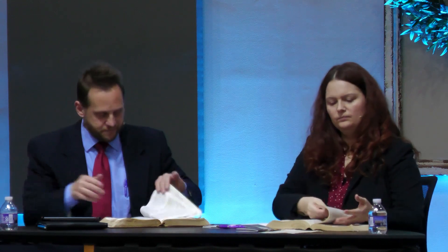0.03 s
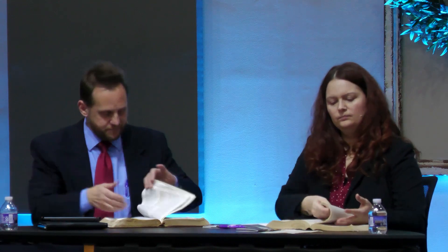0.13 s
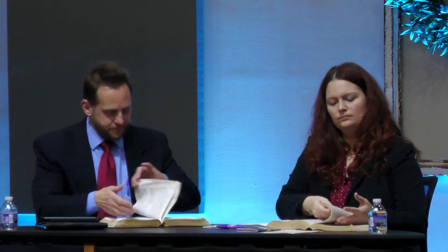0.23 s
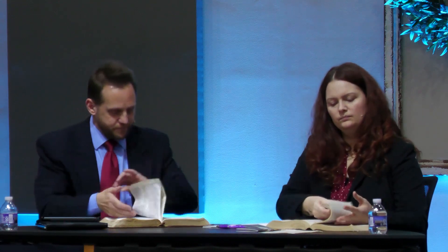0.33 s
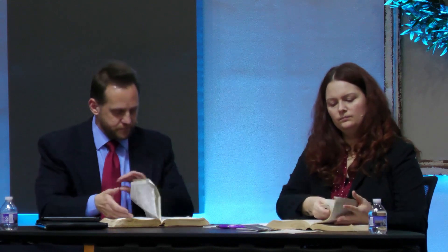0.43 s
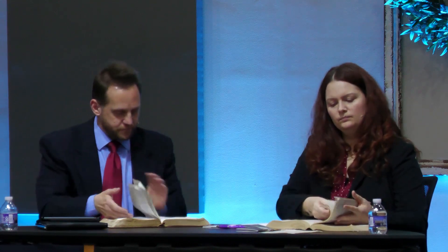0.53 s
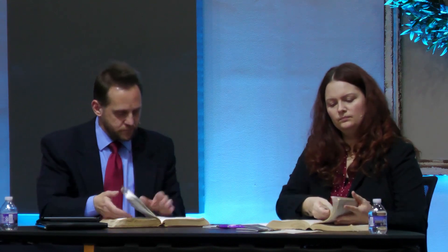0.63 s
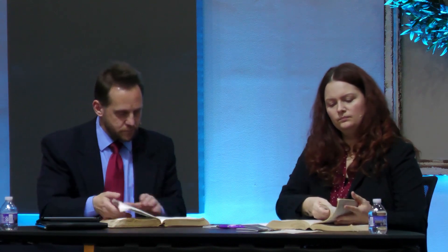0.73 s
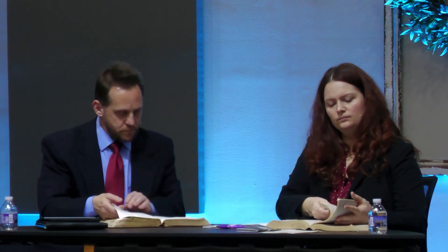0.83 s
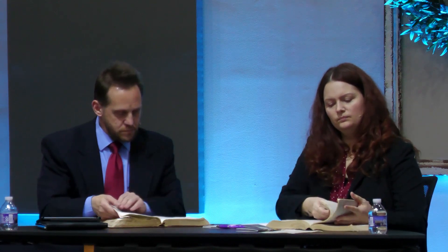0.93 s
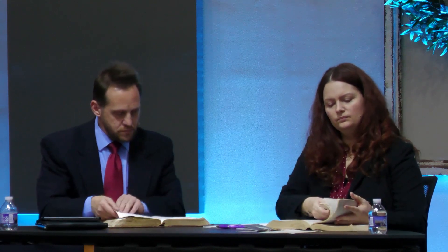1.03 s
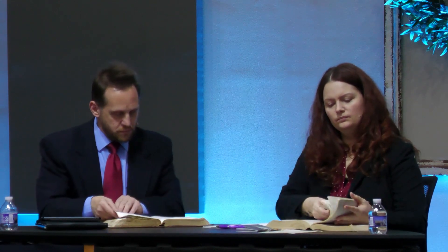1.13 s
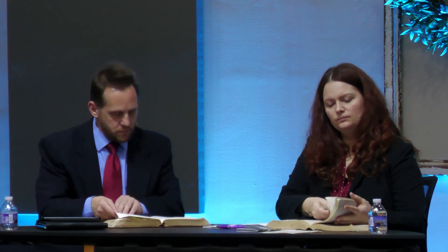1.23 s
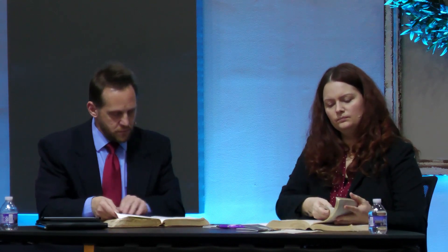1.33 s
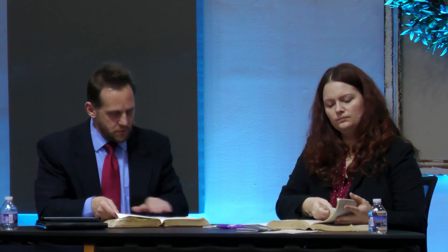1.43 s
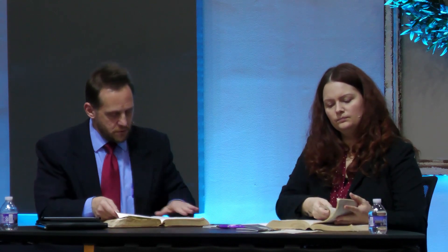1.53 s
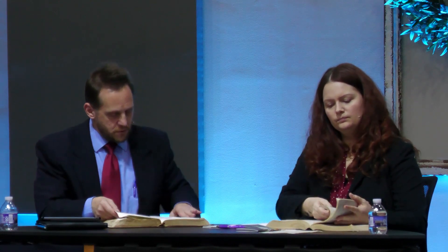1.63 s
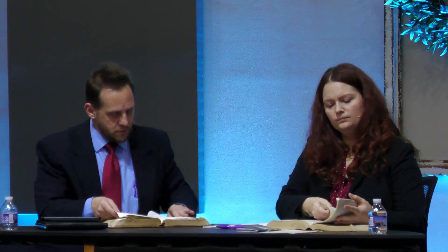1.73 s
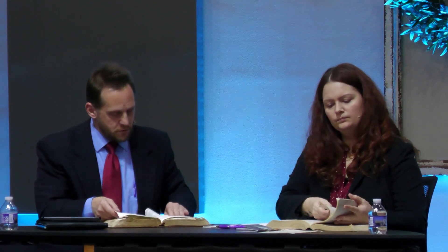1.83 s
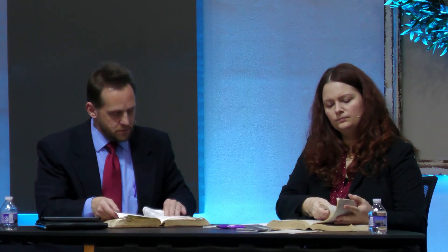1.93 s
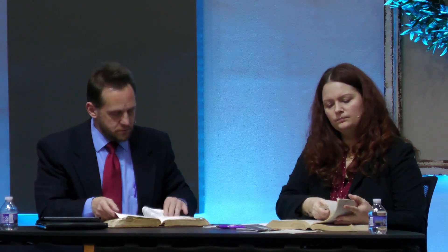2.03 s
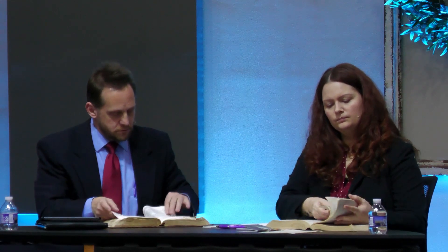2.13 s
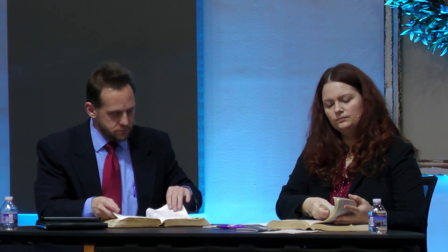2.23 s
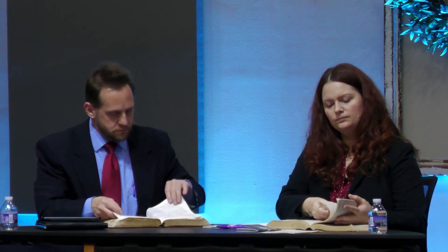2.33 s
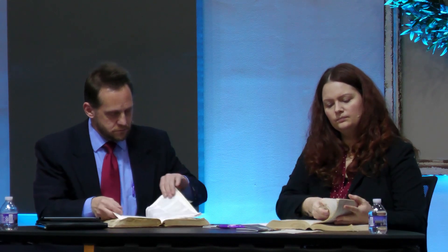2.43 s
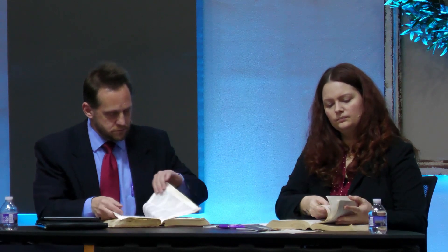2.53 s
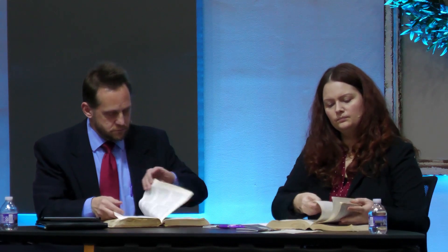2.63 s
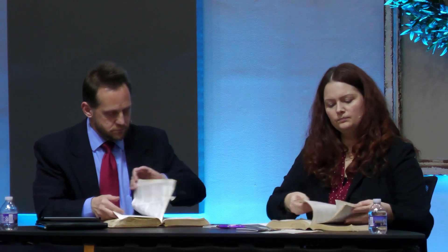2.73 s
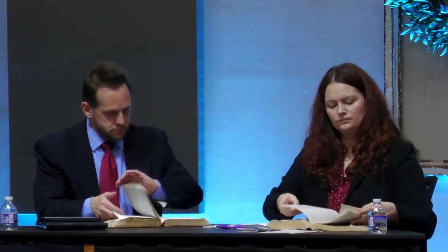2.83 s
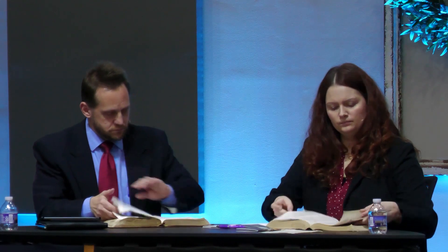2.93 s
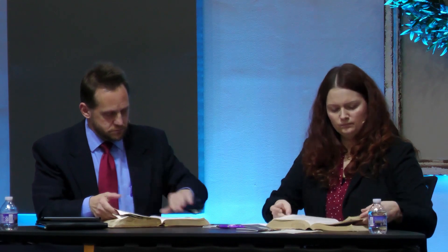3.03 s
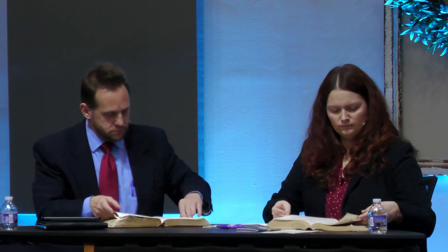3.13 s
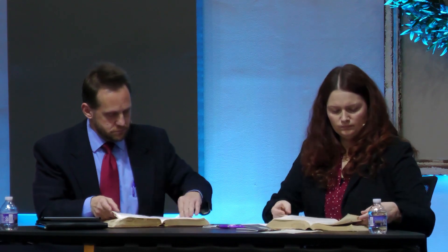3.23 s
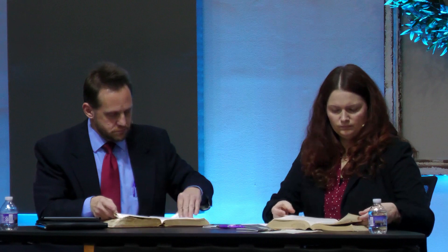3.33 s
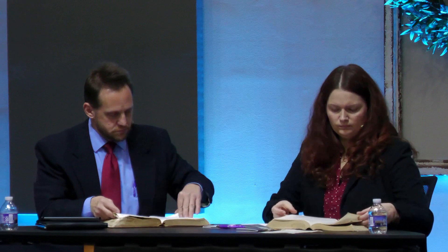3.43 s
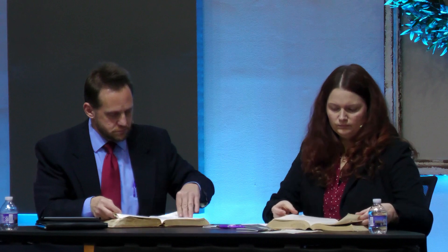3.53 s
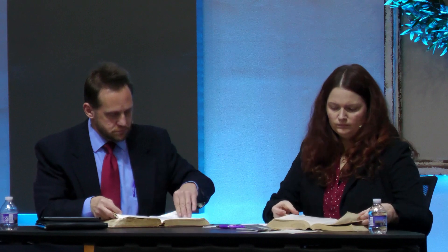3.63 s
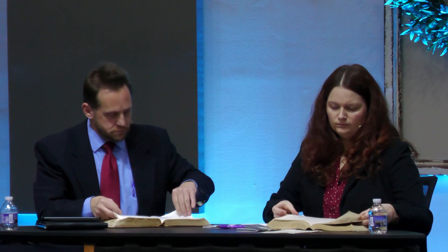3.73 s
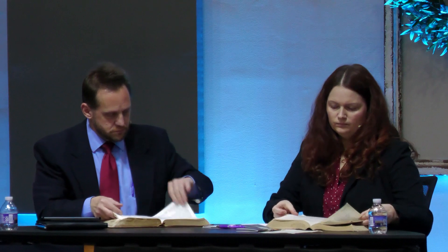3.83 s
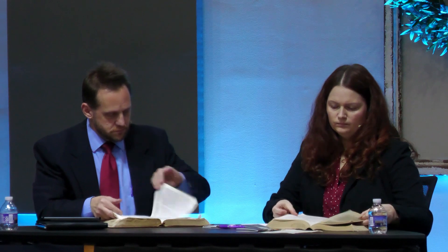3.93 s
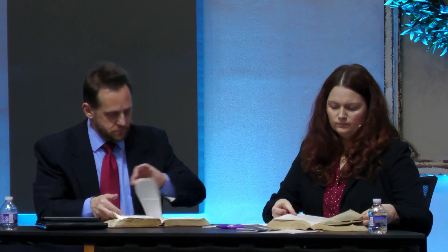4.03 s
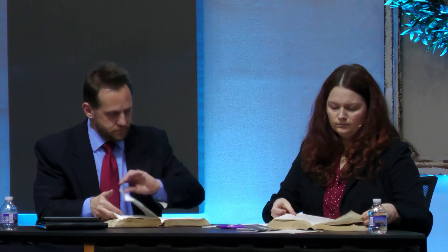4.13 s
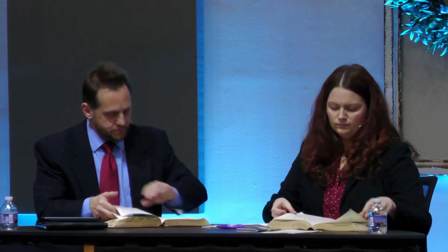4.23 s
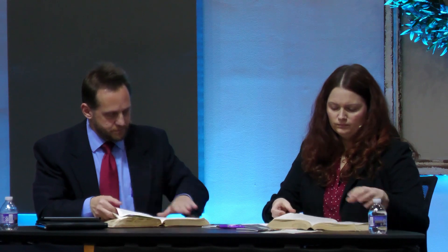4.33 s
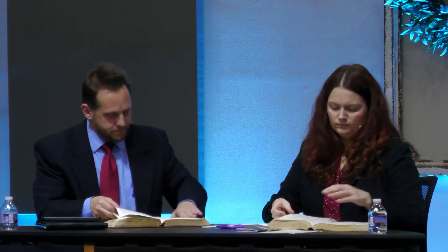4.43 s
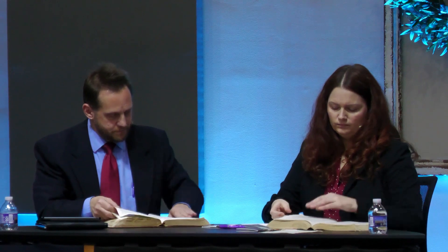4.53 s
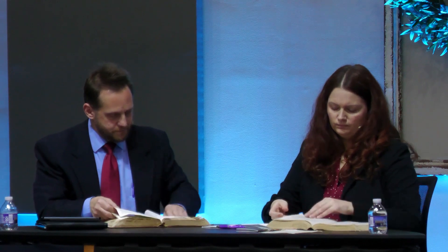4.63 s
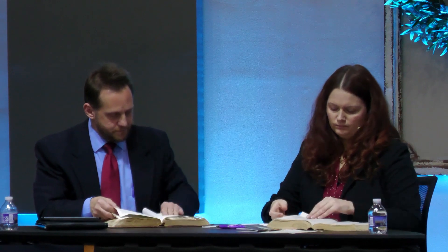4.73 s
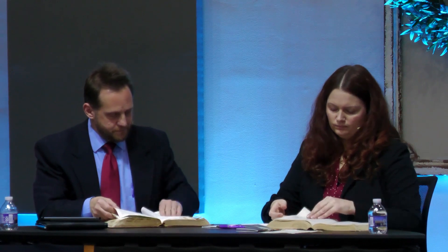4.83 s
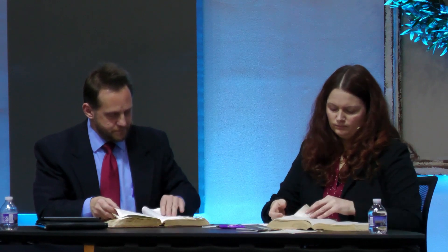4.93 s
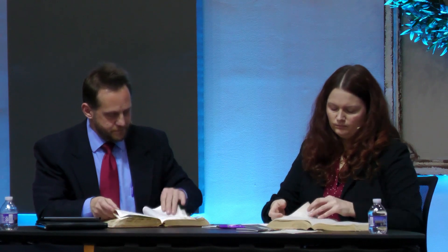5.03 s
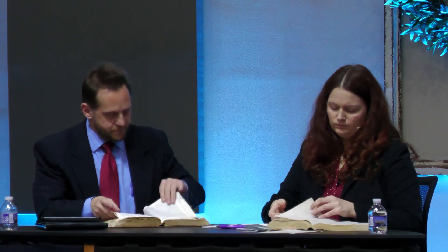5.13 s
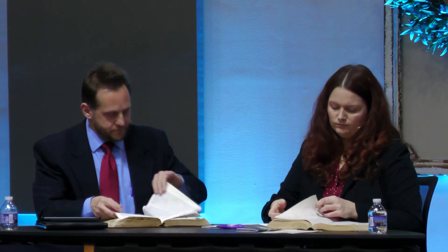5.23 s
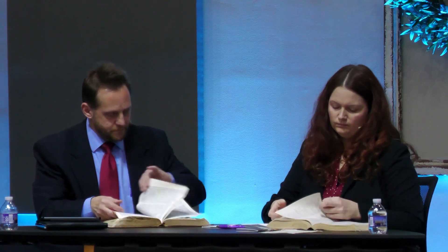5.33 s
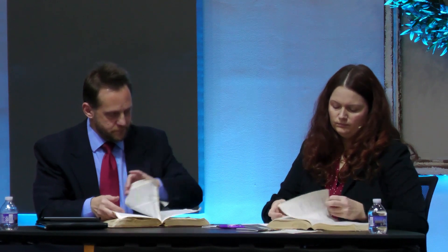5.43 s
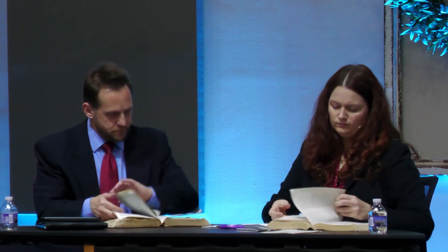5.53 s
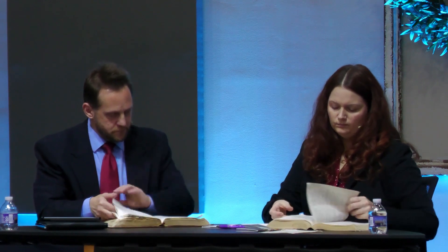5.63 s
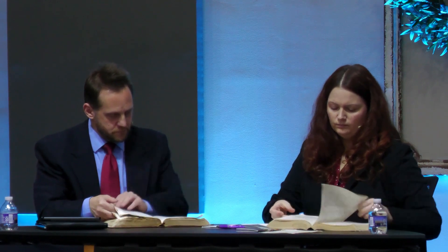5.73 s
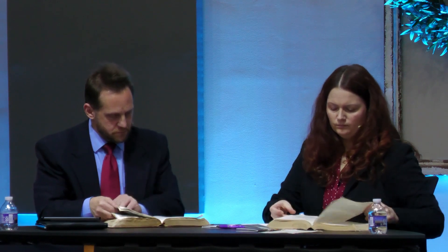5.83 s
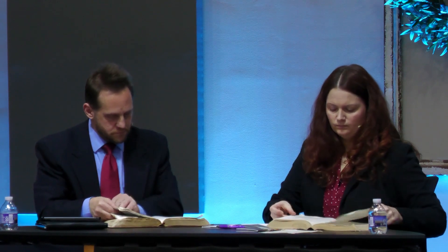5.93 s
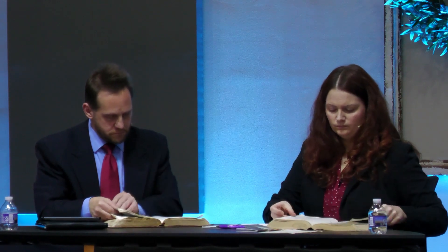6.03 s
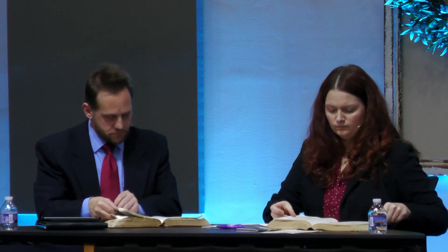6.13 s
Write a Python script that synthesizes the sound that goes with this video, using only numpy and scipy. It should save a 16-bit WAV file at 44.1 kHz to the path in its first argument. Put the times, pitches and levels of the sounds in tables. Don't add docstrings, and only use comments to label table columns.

```python
import sys
import numpy as np
from scipy import signal
from scipy.fft import rfft, irfft, next_fast_len
from scipy.io import wavfile
from scipy.ndimage import uniform_filter1d, map_coordinates

SR = 44100
rng = np.random.default_rng(int(sys.argv[2]) if len(sys.argv) > 2 else 0)


def wav_out(sig):
    wavfile.write(sys.argv[1], SR, np.round(np.clip(np.atleast_2d(sig).T, -1, 1) * 32767).astype(np.int16))


def convert_level_to_amplitude(level_db):
    exponent = np.asarray(level_db, float) / 20
    return 10 ** exponent


N = 272626

# (frequency [Hz], level per Hz [dB])
CRUMPLE = [(1300, -52.5), (2300, -5.5), (3500, 1), (4400, -0.5), (5200, -23), (8000, -45.5)]
FLAP = [(250, -16.5), (700, -7), (1300, -2.5), (2100, -0.5), (2700, -4.5), (4500, -31.5)]
RUB = [(3200, -55.5), (4700, -3.5), (6000, -1), (7300, -2), (8600, -4.5), (12000, -46.5)]
EDGE = [(5500, -40), (7600, -7), (9200, 1), (12000, 0.5), (15000, -4), (17000, -26.5)]


def unit(x):
    return x / np.sqrt(np.mean(x ** 2) + 1e-20)


def along(points, hz):
    f, v = np.transpose(points)
    return np.interp(np.log(hz + 1), np.log(f + 1), v)


def filtered(x, response):
    m = next_fast_len(N + SR // 2)
    hz = np.fft.rfftfreq(m, 1 / SR)
    return irfft(rfft(x, m) * response(hz), m)[..., :N]


def coloured(x, spectrum):
    power = np.mean(convert_level_to_amplitude(along(spectrum, np.linspace(0, SR / 2, num=999))) ** 2)
    return filtered(x, lambda hz: convert_level_to_amplitude(along(spectrum, hz)) / np.sqrt(power))


def struck(x, spectrum):
    cep = irfft(np.log(convert_level_to_amplitude(along(spectrum, np.fft.rfftfreq(2048, 1 / SR)))))
    cep[1:1024] *= 2
    ring = irfft(np.exp(rfft(cep[:1024], 2048)))
    return signal.fftconvolve(x, ring / np.linalg.norm(ring))[:N]


def band(x, note_hz, sharpness):
    hz = np.fft.rfftfreq(x.shape[1], 1 / SR)
    width = 1j * hz * note_hz / sharpness
    return irfft(rfft(x) * width / (note_hz ** 2 - hz ** 2 + width))


def wobble(rate):
    knots = rng.standard_normal(int(N * rate / SR) + 4)
    return map_coordinates(knots, [np.arange(N) * rate / SR])


def patchy(depth_db):
    z = signal.stft(rng.standard_normal(N), nperseg=256)[2]
    field = uniform_filter1d(rng.standard_normal(z.shape), size=7, axis=0)
    field = uniform_filter1d(field, size=9, axis=1)
    return unit(signal.istft(z * convert_level_to_amplitude(depth_db * unit(field)), nperseg=256)[1][:N])


def strokes(rows):
    drop_db, curve = 11, 0.95
    t_ms = np.arange(0, N + 64, 64) / SR * 1000
    s, db, swell_ms, fade_ms = np.transpose(rows)[:, :, None]
    late_ms = t_ms - 1000 * s
    gone = np.abs(late_ms) / np.maximum(np.where(late_ms < 0, swell_ms, fade_ms), 3)
    power = (convert_level_to_amplitude(db - drop_db * gone ** curve) ** 2).sum(axis=0)
    return np.interp(np.arange(N) / SR * 1000, t_ms, power)


def placed(rows, s, lead):
    at = np.round(s * SR).astype(int) + np.arange(rows.shape[1])
    return np.bincount(at.ravel(), rows.ravel(), N + rows.shape[1])[lead:][:N]


def slides():
    # (strongest moment [s], level [dB], swell [ms], fade [ms])
    drags = [(0.0, -46, 10, 57), (.27, -53.5, 360, 90), (.34, -64, 54, 120), (.70, -57, 13, 18),
             (.76, -67, 20, 620), (1.05, -72, 90, 240), (1.27, -58, 11, 65), (1.9, -58, 110, 200),
             (2.2, -54, 52, 28), (2.51, -60.5, 160, 780), (2.71, -54, 24, 280), (2.96, -60, 39, 110),
             (3.07, -49.5, 15, 58), (3.31, -52.5, 35, 100), (3.39, -50.5, 69, 10), (3.47, -52, 29, 68),
             (3.6, -58, 43, 610), (3.92, -61, 210, 120), (4.04, -48, 34, 20), (4.17, -52, 12, 39),
             (4.46, -57, 55, 43), (4.72, -59, 330, 190), (4.98, -57.5, 340, 60), (5.07, -44.5, 44, 110),
             (5.19, -48, 88, 69), (5.42, -47.5, 24, 86), (5.56, -47.5, 8, 140), (5.74, -49, 33, 110),
             (5.96, -59, 120, 90), (6.06, -49.5, 170, 103)]
    bends = [(0.0, -50, 10, 205), (.275, -58, 25, 90), (.44, -56, 110, 104), (.73, -56.5, 15, 120),
             (.77, -52.5, 73, 110), (1.05, -64.5, 120, 190), (1.27, -60.5, 21, 110), (1.36, -61, 100, 66),
             (1.9, -64.5, 260, 150), (2.3, -66, 200, 390), (2.51, -56.5, 90, 370), (2.71, -59, 33, 470),
             (2.96, -57.5, 71, 93), (3.07, -53, 18, 18), (3.31, -63.5, 100, 160), (3.47, -62, 49, 73),
             (3.6, -64.5, 50, 210), (3.92, -55.5, 170, 110), (4.04, -55.5, 72, 66), (4.15, -57.5, 81, 95),
             (4.46, -67, 250, 350), (4.73, -61.5, 200, 100), (4.99, -67.5, 510, 40), (5.07, -59, 37, 180),
             (5.19, -53.5, 160, 100), (5.42, -52.5, 34, 130), (5.555, -48.5, 23, 65), (5.811, -36, 9, 18),
             (5.94, -50.5, 440, 170), (6.07, -71, 230, 240)]
    brushes = [(.16, -62, 80, 66), (.27, -59, 60, 100), (.76, -59, 100, 170), (1.68, -64, 19, 280),
               (2.05, -62.5, 400, 15), (2.3, -60, 54, 300), (2.9, -60.5, 160, 170), (3.725, -54, 30, 60),
               (3.9, -56, 83, 110), (4.38, -65, 15, 130), (4.7, -69, 150, 54), (4.95, -56, 340, 60),
               (5.09, -59, 56, 210), (5.42, -51, 31, 120), (5.6, -63, 68, 51)]
    # (crumple [dB], flap [dB], rub [dB], edge [dB])
    drag_drives = [-21, -40, -5, -0.73]
    bend_drives = [-3, -6, -6.5, -25]
    brush_drives = [-13.5, -14.5, -1.5, -6.5]
    resting_hands = [-81, -75, -75, -72]

    drag, bend, brush = strokes(drags), strokes(bends), strokes(brushes)
    drives = convert_level_to_amplitude([drag_drives, bend_drives, brush_drives, resting_hands]).T ** 2
    levels = [np.sqrt(d * drag + b * bend + r * brush + rest) for d, b, r, rest in drives]

    slips_per_s = 260
    slips = (rng.random(N) < slips_per_s / SR) * convert_level_to_amplitude(7.8 * np.clip(rng.standard_normal(N), -2, 2))
    fibre_ticks = signal.lfilter([1], [1, -.95], slips)
    uneven = convert_level_to_amplitude(1.2 * wobble(35) + 0.9 * wobble(130))
    grip = unit(uneven * (1 + 0.38 * fibre_ticks))
    voices = zip(levels, (CRUMPLE, FLAP, RUB, EDGE))
    return sum(level * coloured(grip * patchy(depth_db=1.7), voice) for level, voice in voices)


def snaps():
    # (time [s], body level [dB], crispness against body [dB], length [ms])
    corners = [(0.0429, -36.5, 12, 0.91), (0.078, -42, 8.5, 4), (0.197, -50, 0, 3.4),
               (0.209, -46.5, 14, 1.7), (0.2555, -47, 13, 1.5), (.345, -52, -6, .55),
               (1.0803, -47, 15, 0.5), (1.1541, -42.5, -1, 0.57), (2.1287, -57, 12, 0.76),
               (2.478, -49, 1, .55), (2.5541, -37.5, 4, 1.8), (2.557, -38.5, -2.5, 0.47),
               (2.6395, -52, 2, 0.54), (2.6938, -43.5, -2, 2.6), (2.8408, -46, -3, 1.8),
               (3.4213, -57, 19, 1.1), (3.6579, -43, 10, 0.65), (3.7829, -48, 12.5, 2),
               (3.805, -50, 10, 0.6), (3.857, -50.5, 6, 3.3), (3.8723, -43, -10, 0.67),
               (3.9205, -46, -5, 2.5), (4.045, -46, 4, 0.6), (4.8764, -48.5, 12, 0.6),
               (4.959, -36.5, 4, 0.5), (4.9924, -34, 10.5, 0.52), (5.0898, -41.5, 3, 2.3),
               (5.4737, -49, 13, .55), (5.5258, -23.5, 2.5, 0.83), (5.5317, -28, -8, 0.6)]
    creases = [(0.4428, -48.5, 7, 0.77), (0.705, -46, 8, 0.6), (1.1642, -53.5, 3, 1.9),
               (1.187, -57, 10, 0.86), (2.2595, -48, 6.5, 0.63), (2.3128, -55, -5, .6),
               (2.4442, -51, -10, .55), (2.497, -40, -3, 0.43), (2.6815, -51, -3, .55),
               (2.703, -42, 11.5, 0.68), (2.7882, -37.5, 7.5, 0.46), (2.985, -47, 7, 0.51),
               (3.0228, -45, -5, 1.5), (3.451, -52, 7, 0.79), (3.5205, -52, 10, .55),
               (3.5912, -42.5, 11, 1.6), (3.625, -38.5, 13.5, 0.36), (3.7666, -41.5, -17, 1.3),
               (3.839, -50, 4, 1.1), (3.8868, -43, 2, .9), (3.9038, -35, 11.5, 1.1),
               (3.9315, -35.5, 8.5, 1.13), (3.9692, -49, 4, 0.59), (4.141, -43, -15, 0.81),
               (4.7343, -43.5, 6, 0.45), (5.1924, -45, -7, 0.74), (5.2749, -40.5, 7, 0.67),
               (5.3558, -45, 5, 0.49), (5.4047, -44.5, 8, 2.2), (6.1155, -44.5, 8, 0.89)]
    folds = [(.004, -50, 1, 9.3), (0.02, -44, -1, 4.7), (0.2663, -48.5, -1, 1.8), (0.3643, -52, -11, 3.6),
             (0.375, -46, 6, 1.2), (0.404, -50, 6, 1.3), (0.522, -49, -8, 7), (0.5839, -53.5, -1, 1.5),
             (0.6994, -53, 2, 2.1), (0.7208, -44, -7, 3.8), (0.771, -42.5, -1.5, 7.3),
             (1.0312, -52, -2, 3.8), (1.3705, -55, -2, 5), (2.508, -42.5, -0.5, 2.1),
             (2.9459, -47, 7.5, 7.4), (3.577, -49, 0, 1.9), (3.8184, -40.5, 6.5, 2.6),
             (4.427, -59, -1, 6.3), (4.4548, -54.5, -7, 2.8), (4.9665, -54, 8, 4.3), (5.034, -48, 1, 2.3),
             (5.104, -52, -18, 8.1), (5.2028, -50, 6, 3.3), (5.2668, -53, 10.5, 2.3), (5.4135, -47, -5, 2),
             (5.548, -46, -10, 2.1), (5.556, -40, -13, 2.6), (5.817, -32, -26, 2), (5.919, -39, -16, 8.6),
             (5.9525, -44, -20, 5)]
    sheets = [(0.4215, -50.5, -5, 3), (0.437, -46, -10, 0.71), (0.452, -41.5, -27, 1.46),
              (0.8723, -63.5, 6, 13), (1.5638, -55, -2, 0.42), (1.83, -45, -4, 0.81),
              (2.3042, -53, -6, 0.65), (2.533, -57, 6, 1.1), (3.3018, -62, 11, .55),
              (3.336, -61.5, 15, 6.2), (3.7596, -56, 10, 0.5), (4.0314, -51, 5, 0.93),
              (4.1337, -54, -24, 2.5), (4.273, -50, -18, 0.52), (4.604, -57.5, -2, 12),
              (4.687, -61, 7, .55), (4.7183, -50, 4, 1.5), (5.185, -45.5, 5, 0.5), (5.31, -57, 8, 2.3),
              (5.5914, -45, -5, .55), (5.618, -48.5, -4, 11), (5.7464, -50, -7, 7.2)]
    edge_ticks = [(0.4704, -60.5, 16, 3.4), (0.502, -58, 4, 2.2), (1.054, -59, 10, 1), (1.0664, -53, 4, 1),
                  (1.978, -57, 7, 2.7), (2.2137, -56.5, 9, 0.46), (5.756, -60, 23, .55),
                  (5.828, -54, -4, .8), (2.427, -51, -3, 1), (4.0823, -65, 13, 1), (3.582, -58, -7, .55),
                  (4.2209, -65.5, 20, 1.9), (5.165, -56.5, 17, 4), (5.227, -45, 4, .55),
                  (5.299, -49.5, -1, 3), (5.8046, -35, 11.5, 3.6)]
    # (flap against body [dB], rise over length [ratio])
    kinds = [
        (-18.5, 0.55),
        (-10.5, 0.67),
        (-13, 0.3),
        (-2.5, 0.83),
        (-14, 0.18),
    ]

    rows = []
    for kind, (flap_db, rise) in zip((corners, creases, folds, sheets, edge_ticks), kinds):
        for s, db, edge_db, ms in kind:
            rows.append((s, db, flap_db, edge_db, rise * ms, ms))
    lead = SR // 40
    t_ms = (np.arange(3 * lead) - lead) / SR * 1000
    force = np.zeros((4, N + len(t_ms)))
    bursts = rng.standard_normal((len(rows), len(t_ms)))
    bursts[:, lead] = 1.76
    for (s, db, flap_db, edge_db, rise_ms, fall_ms), burst in zip(rows, bursts):
        fall = max(fall_ms, .2) * np.array([[1.5], [1.25], [1], [.8]])
        before = convert_level_to_amplitude(-6.5 * (t_ms / max(rise_ms, .1)) ** 2)
        flutter = convert_level_to_amplitude(-17.0 - 2.3 * np.abs(t_ms))
        after = convert_level_to_amplitude(-6.5 * np.abs(t_ms) / fall) + flutter
        shape = np.where(t_ms < 0, before, after)
        lean_db = 0.64 * np.clip(edge_db, -24, 4)
        levels = [[flap_db], [-4.5 - 0.18 * lean_db], [0.5 + lean_db], [edge_db]]
        force[:, round(s * SR):][:, :len(t_ms)] += convert_level_to_amplitude(db + 1.0) * convert_level_to_amplitude(levels) * shape * burst
    voices = zip(force, (FLAP, CRUMPLE, RUB, EDGE))
    snap = sum(struck(f[lead:][:N], voice) for f, voice in voices)
    return filtered(snap, lambda hz: 1 / (1 + (hz / 12800) ** 4))


def puckers():
    # (time [s], level [dB], note [Hz],
    # length [ms])
    springs = [(.165, -58, 2500, 2), (0.2553, -34, 6900, 2), (0.28, -49, 3500, 1.5), (.304, -51, 3800, 1.5),
               (.412, -52, 6500, 1), (0.4217, -45, 3800, 1.5), (.462, -53, 6500, 1), (.491, -62, 1000, 3),
               (0.542, -57, 980, 2.6), (.740, -44, 3220, 3), (0.761, -37, 4900, 1.5),
               (0.7748, -36.5, 5400, 3), (.863, -52, 5200, 1.5), (1.0797, -45, 3340, 1.8),
               (1.314, -54, 6500, 1.5), (1.5645, -60.5, 990, 1.7), (1.579, -62, 1200, 2),
               (1.799, -55, 7000, 1), (1.811, -60, 1600, 1.5), (1.8299, -52, 950, 2.5),
               (1.8315, -50, 1500, 2.7), (1.997, -55, 8500, 1), (2.619, -48, 5000, 1),
               (2.712, -44, 6500, 1), (2.728, -46, 10000, 1), (2.755, -44.5, 4550, 1.5),
               (2.9, -57.5, 1000, 3.7), (2.925, -54, 5000, 1), (3.059, -44, 3780, 2.7),
               (3.286, -49, 10100, 1), (3.505, -51, 3770, 1.5), (3.721, -55, 3000, 1),
               (3.767, -36, 9000, 1.2), (3.825, -38, 9000, 1.3), (3.8735, -33, 12000, 1.2),
               (3.927, -42, 8500, 1), (4.400, -54, 3800, 1.4), (4.649, -57.5, 1980, 2),
               (4.995, -58, 2500, 1.5), (5.014, -45, 6500, 1), (5.069, -45, 3800, 2),
               (5.079, -47, 3800, 1.5), (5.307, -52, 3800, 1.5), (5.5465, -36, 7000, 1.5),
               (5.607, -45, 3800, 2.3), (5.803, -31.5, 2130, 2.4), (5.8165, -30, 7500, 2),
               (5.827, -40, 7500, 1), (5.918, -37, 9800, 2),
               (0.02, -40, 4000, 3), (0.045, -34, 4140, 1.5), (.345, -50, 5500, 1), (2.556, -33, 4530, 4),
              (3.422, -50, 12000, 1.3), (3.766, -46, 2840, 1.5), (3.82, -46, 2460, 1.6),
              (3.902, -46, 2000, 1.8), (5.5258, -15, 9000, 0.21), (5.5317, -29, 8500, 0.33),
              (5.756, -50, 11000, .6), (5.807, -30, 3470, 2), (5.922, -51, 3480, 5),
              (5.9553, -40, 2200, 6.7), (5.961, -47, 7500, 1.5), (6.117, -44, 12000, 1.5),
              (.195, -43, 5500, 2), (.205, -43, 5500, 1), (5.034, -32, 8200, 1.5), (.033, -48, 4500, 1),
              (3.5855, -44, 5500, .5), (3.664, -45, 5000, .6), (4.972, -43, 5300, .8),
              (5.524, -38, 5200, .5)]
    s, db, note_hz, ms = np.transpose(springs)[:, :, None]
    t_ms = np.arange(2048) / SR * 1000
    rattle = 0.39 * rng.standard_normal((len(s), len(t_ms)))
    kicks = rattle * convert_level_to_amplitude(-6.5 * t_ms / np.maximum(ms, .2))
    kicks[:, 0] = 2.56
    rings = band(kicks, note_hz, sharpness=4.8)
    rings = rings / np.abs(rings).max(axis=1, keepdims=True)
    return placed(convert_level_to_amplitude(db + 6.0) * rings, s, lead=0)


def streaks():
    # (middle [s], level [dB], note [Hz], swell [ms], fade [ms])
    tracks = [(.31, -57, 9000, 9.2, 12), (.69, -61, 11000, 3, 10), (.745, -51, 3200, 15, 21),
              (.80, -61, 3200, 11, 33), (1.72, -69, 5550, 40, 71), (2.17, -67, 9900, 14, 45),
              (3.085, -54, 11900, 25, 20), (3.384, -57, 9400, 28, 12), (3.47, -63, 3900, 20, 76),
              (3.73, -56, 11000, 15, 16), (3.859, -53, 3970, 6.9, 27), (4.11, -71, 2500, 10, 11),
              (4.165, -48, 9900, 9, 32), (4.18, -64, 3680, 18, 40), (4.37, -61, 12000, 5.4, 32),
              (5.56, -50.5, 2700, 17, 20), (5.615, -49, 10400, 14, 28), (5.69, -53, 11000, 18, 44),
              (5.78, -54, 3080, 8, 9.1), (5.841, -52, 2150, 18, 27), (5.85, -55, 9300, 20, 60),
              (5.925, -47, 2820, 21, 17), (5.974, -56, 10700, 50, 51), (6.051, -57.5, 3700, 54, 59),
              (6.07, -49, 8400, 73, 40), (3.32, -59, 12000, 30, 25), (4.042, -68, 8900, 27, 22),
              (4.968, -53, 5600, 6.8, 13), (5.954, -45, 3100, 8, 12), (5.81, -43, 1600, 9, 13),
              (5.13, -57.5, 4770, 100, 53), (.225, -58, 3500, 45, 18), (.56, -74, 13500, 88, 100),
              (4.1, -67, 10500, 30, 41), (3.94, -62, 730, 14, 31), (5.45, -58, 12300, 54, 60),
              (5.809, -38, 3250, 7, 13)]
    s, db, note_hz, swell_ms, fade_ms = np.transpose(tracks)[:, :, None]
    lead = SR // 8
    t_ms = (np.arange(2 * lead) - lead) / SR * 1000
    size = (len(s), 2 * lead)
    grit = rng.standard_normal(size) * convert_level_to_amplitude(4.2 * rng.standard_normal(size))
    hiss = band(band(grit, note_hz, sharpness=3.6), note_hz, sharpness=1.1)
    gone = t_ms / np.maximum(np.where(t_ms < 0, swell_ms, fade_ms), 2)
    shape = convert_level_to_amplitude(db - 7.9 * gone ** 4)
    return placed(shape * hiss / hiss.std(axis=1, keepdims=True), s, lead=lead)


def echoes(x):
    # (frequency [Hz], time [s])
    dying = [(500, 1), (3000, 0.14), (12000, 0.24)]
    hz, t, z = signal.stft(rng.standard_normal(SR // 2), SR, nperseg=256)
    fade = convert_level_to_amplitude(-60 * t / along(dying, hz)[:, None])
    tail = signal.istft(z * fade, SR, nperseg=256)[1]
    late = np.pad(x, (600, 0))
    return signal.fftconvolve(late, tail / np.linalg.norm(tail))[:N]


def hall():
    # (frequency [Hz], level per Hz [dB])
    air_colour = [(1.2, -24), (2, 11), (14, -5), (33, -15), (50, -18.5), (74, -10.5), (95, -18), (190, -16),
                  (274, -21.5), (328, -27), (450, -32), (880, -120)]
    # (strongest moment [s], level [dB], swell [ms], fade [ms])
    thumps = [
        (0.0, -67, 30, 80),
        (.43, -67, 40, 30),
        (5.83, -61, 610, 56),
    ]
    # (frequency [Hz], level per Hz [dB])
    hiss_colour = [(180, 1), (300, -3.5), (560, -1), (1110, -10.5), (1460, -14), (15500, -17)]
    # (strongest moment [s], level [dB], swell [ms], fade [ms])
    stir = [
        (3.6, -67.5, 1400, 1900),
    ]
    # (frequency [Hz], peak level [dB])
    hum_tones = [(120.7, -76.5), (75.5, -76)]
    air_db, hiss_db = -65.5, -68

    t = np.arange(N) / SR
    air_level = convert_level_to_amplitude(5.0) * np.sqrt(convert_level_to_amplitude(air_db) ** 2 + strokes(thumps))
    air = air_level * unit(coloured(rng.standard_normal(N), air_colour))
    hiss_level = np.sqrt(convert_level_to_amplitude(hiss_db + 0.13 * wobble(2.0)) ** 2 + strokes(stir))
    hiss = hiss_level * coloured(patchy(depth_db=1.5), hiss_colour)
    hum = 0
    for hz, db in hum_tones:
        hum = hum + convert_level_to_amplitude(db + 0.5 + 2.1 * wobble(3.62)) * np.sin(2 * np.pi * hz * t + wobble(7.8))
    return air + hiss + hum


def scene():
    paper = slides() + snaps() + puckers() + streaks()
    echo_db = -21
    return (paper + hall() + convert_level_to_amplitude(echo_db) * echoes(paper))[None]


def band_limit(x):
    return signal.sosfilt(signal.butter(12, 16660, fs=SR, output="sos"), x)


def record(dry):
    top_hz, attack_db = 15500, 13.5
    top = filtered(dry, lambda hz: hz >= top_hz)
    treble = filtered(dry[0], lambda hz: hz > 3000)
    power = np.abs(uniform_filter1d(treble ** 2, size=128))
    before = np.roll(np.abs(uniform_filter1d(power, size=768)), 512)
    attack = uniform_filter1d(1. * (power > convert_level_to_amplitude(2 * attack_db) * before), size=192) > 1e-6
    kept = convert_level_to_amplitude(-15) * uniform_filter1d(1. * attack, size=192)
    mix = dry - top + filtered(kept * top, lambda hz: hz < 16600)
    return band_limit(mix)


dry = scene()
out = record(dry)
wav_out(out)
```